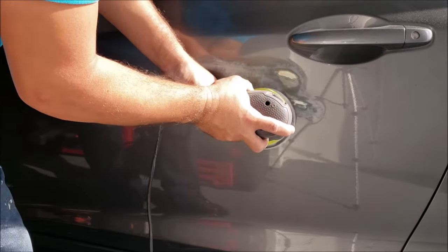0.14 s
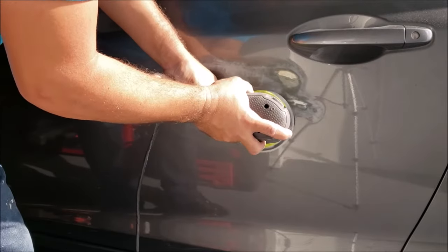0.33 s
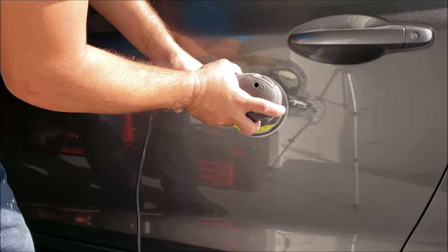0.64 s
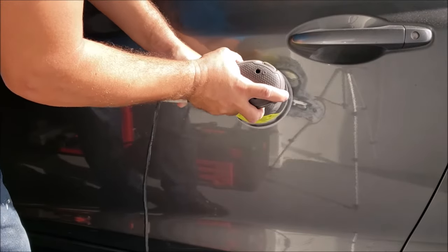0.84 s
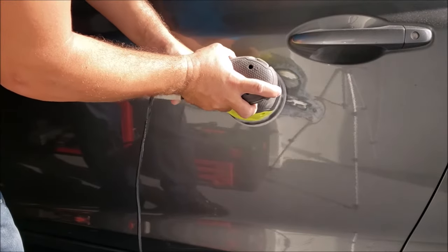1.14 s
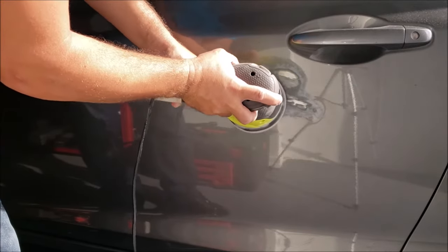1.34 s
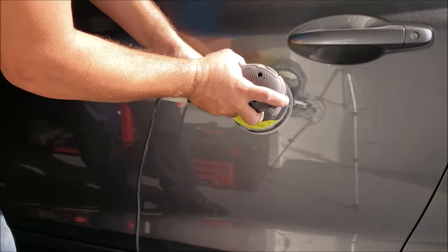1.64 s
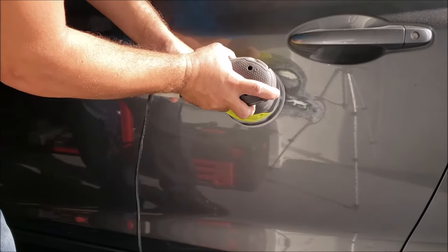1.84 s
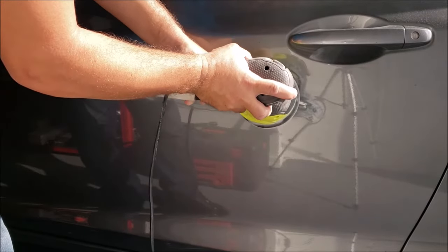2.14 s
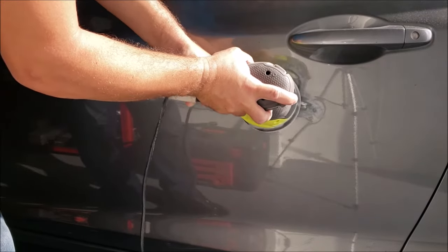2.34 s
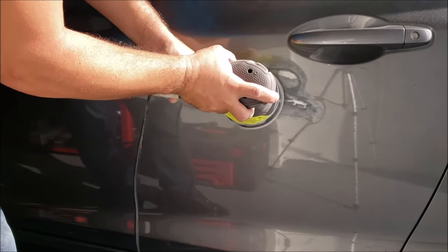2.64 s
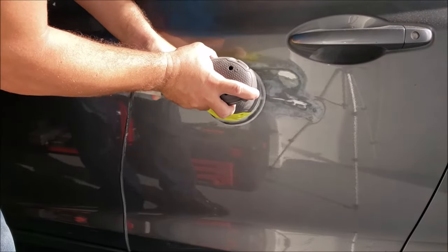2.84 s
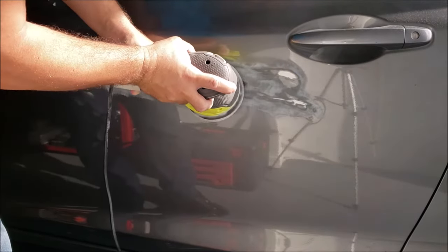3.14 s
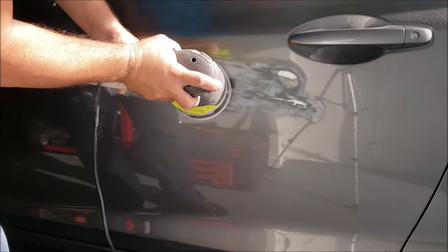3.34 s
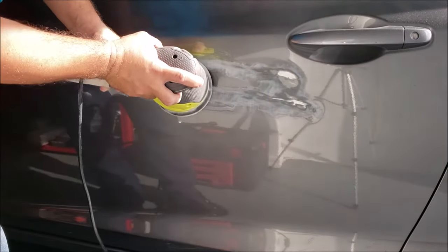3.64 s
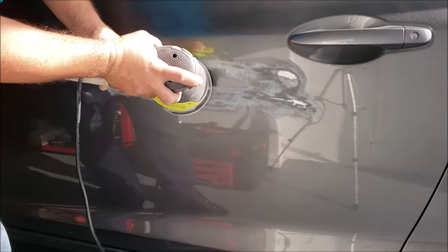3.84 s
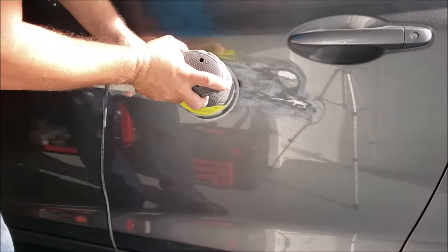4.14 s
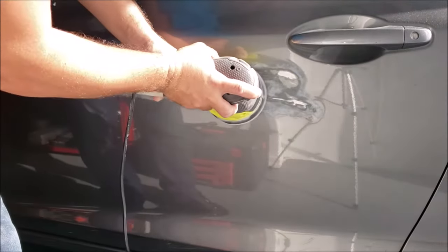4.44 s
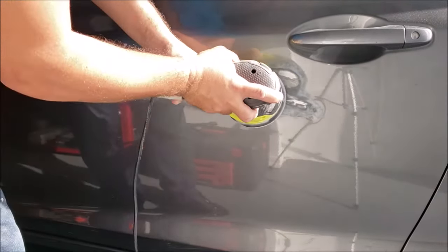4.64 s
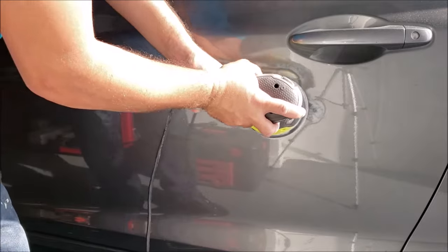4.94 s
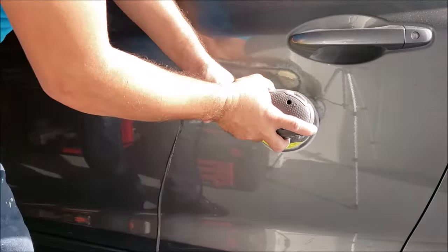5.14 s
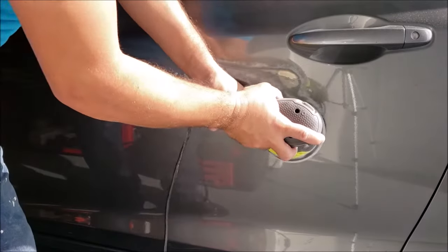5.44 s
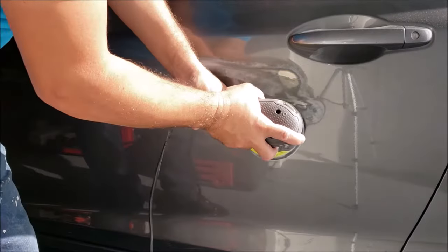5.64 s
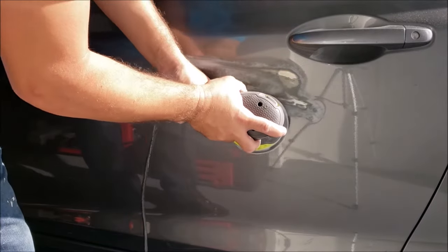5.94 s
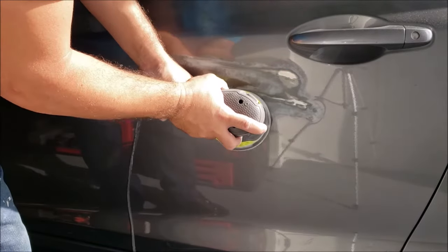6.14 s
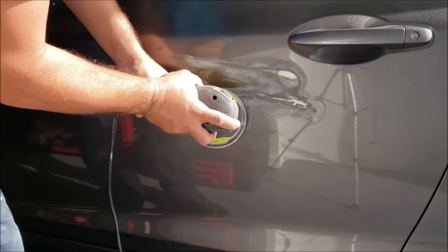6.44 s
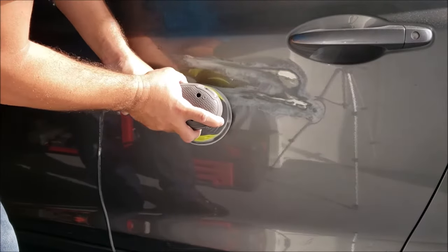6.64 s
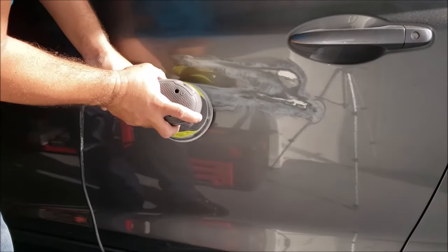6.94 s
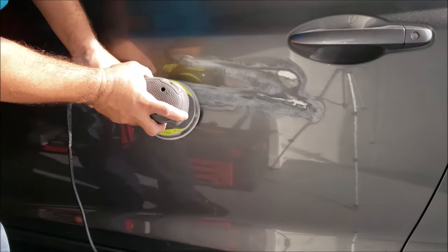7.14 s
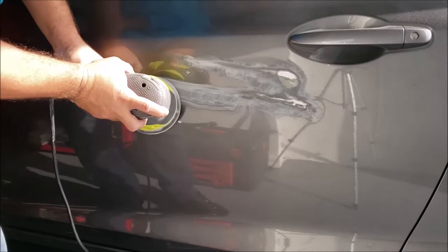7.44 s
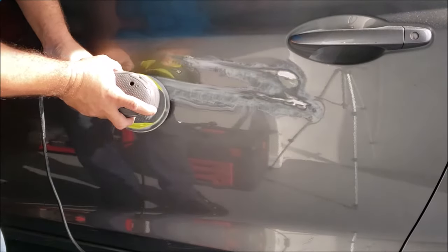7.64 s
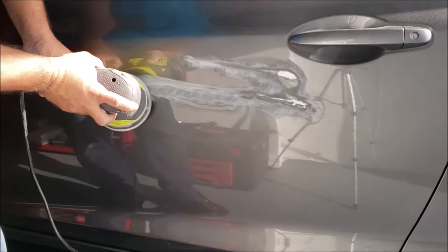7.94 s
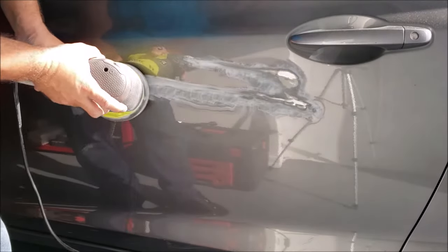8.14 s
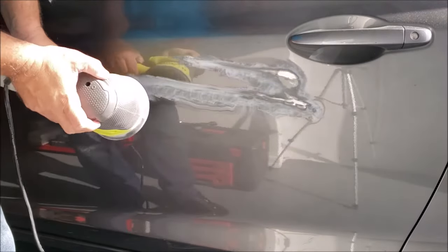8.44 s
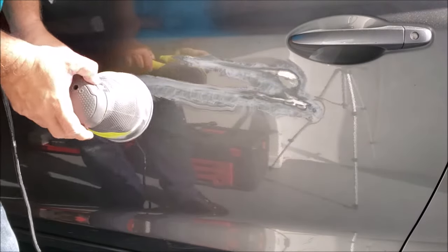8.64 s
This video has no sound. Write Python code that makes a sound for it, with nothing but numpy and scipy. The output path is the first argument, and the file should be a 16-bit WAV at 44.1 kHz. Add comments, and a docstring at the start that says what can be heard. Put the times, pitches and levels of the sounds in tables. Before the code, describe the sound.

An electric orbital sander hums steadily at close range on a steel car door, with gritty hiss, fan air and shifting overtones, then eases off.

```python
"""A workshop: an electric orbital sander strokes a steel car door, then is eased off near the end.
Its eccentric shaft shakes pad and door into a hum, with overtones that swell and fade with the pad's place.
Paper rub, grit hiss and fan air are filtered noise, the first two rough or uneven; short squeals ride on top.
A faint rumble lies below. A stereo microphone stands close by."""
import sys
import numpy as np
from scipy import signal
from scipy.fft import rfft, irfft, next_fast_len
from scipy.io import wavfile
from scipy.ndimage import uniform_filter1d

SR = 44100
rng = np.random.default_rng(int(sys.argv[2]) if len(sys.argv) > 2 else 0)


def inscribe(sig):
    """Save sig as 16-bit PCM at rate SR to the path in sys.argv[1].

    A 1-D sig is mono; a 2-D sig holds one channel per row.
    Samples are clipped to [-1, 1] before scaling.
    """
    pcm = np.round(np.clip(np.atleast_2d(sig).T, -1, 1) * 32767)
    wavfile.write(sys.argv[1], SR, pcm.astype(np.int16))


N = 387626
TIME = np.arange(N) / SR
PORT_S_PER_M = 0.00041  # lag between the two ports for each metre that the pad moves right


def undb(db):
    """Decibels to gain."""
    return 10 ** (np.asarray(db) / 20)


def unit(x):
    """Scale to rms 1."""
    return x / np.sqrt(np.mean(x ** 2))


def curves(table):
    """Each column of a table, joined by straight lines in time."""
    seconds, *columns = np.transpose(table)
    return [np.interp(TIME, seconds, column) for column in columns]


def ramp(start, length):
    """Rise evenly from 0 to 1."""
    return np.clip((TIME - start) / length, 0, 1)


def walk(rate):
    """Smooth random drift: about `rate` fresh draws a second, with a spread near 1."""
    steps = signal.resample_poly(rng.standard_normal(1024), 8, 1)
    return np.interp(TIME * rate * 8, np.arange(len(steps)), steps)


def shaped(x, gain):
    """Filter by a gain that is a function of frequency."""
    size = next_fast_len(N + 8192)
    hz = np.maximum(np.arange(size // 2 + 1) * SR / size, 1)
    return irfft(rfft(x, size) * gain(hz), size)[..., :N]


def spectrum_db(f, spectrum):
    """Read a spectrum table, joined by straight lines over log frequency."""
    hz, db = np.transpose(spectrum)
    return np.interp(np.log(f), np.log(hz), db)


def colour(x, spectrum):
    """Give noise a spectrum, at rms 1."""
    return unit(shaped(x, lambda f: undb(spectrum_db(f, spectrum))))


def ring(x, modes):
    """Pass through a bank of parallel resonances, at rms 1."""
    def gain(f):
        return sum(undb(db) / (1 + 1j * (f * f - hz * hz) / (f * width)) for hz, width, db in modes)
    return unit(shaped(x, gain))


def noise_pair(likeness):
    """Left and right noise with the given correlation."""
    c = np.clip(likeness, 0, 1)
    mid, side = rng.standard_normal((2, N))
    return np.sqrt((1 + c) / 2) * mid + np.sqrt((1 - c) / 2) * np.array([side, -side])


def pan(db):
    """Left and right gains for a level difference, left minus right."""
    return undb(np.array([[.5], [-.5]]) * db)


def tone(phase, lead):
    """A sine of rms 1 that reaches the left port `lead` radians before the right."""
    return np.sqrt(2) * np.sin(phase + np.array([[.5], [-.5]]) * lead)


# shaft speed under changing load, before a slight random waver: (time [s], speed [turns/s])
SHAFT_SPEED = [(0, 205.5), (.2, 206.2), (.72, 207.3), (.87, 207.3), (1.03, 206.2), (1.25, 206.4),
               (1.83, 205.4), (2.45, 204.5), (2.9, 205.1), (3.45, 204.9), (3.82, 205.4), (4.15, 206.2),
               (4.6, 204.6), (5.1, 205.7), (5.35, 206.9), (6.15, 205.8), (6.95, 204.6), (7.4, 205),
               (7.82, 205.4), (8.2, 207.7), (8.55, 211.8), (8.65, 210.5), (8.79, 199.4)]


def shaft(waver=0.00093):
    """The motor shaft: its speed, and its running angle in radians with a slight random waver."""
    speed = curves(SHAFT_SPEED)[0]
    turn = 2 * np.pi * np.cumsum(speed * (1 + waver * walk(20))) / SR
    return speed, turn


# strokes along the door: (time [s], right of the microphone [m], above the starting height [m])
STROKES = [(0, .096, 0.0021), (.5, 0.093, 0.017), (1.2, 0.076, 0.043), (2.3, 0.088, 0.056),
           (3.2, -0.014, 0.079), (3.75, -0.062, 0.088), (4.2, -.032, 0.053), (4.8, .1, 0.054),
           (5.45, .158, -0.0087), (6, 0.072, -0.0052), (7, -.1, 0.028), (8, -.22, 0.035), (8.79, -.23, .04)]


def pad_place():
    """Metres right and up of the pad, moved smoothly by the hands."""
    return uniform_filter1d(np.array(curves(STROKES)), size=SR // 8, mode="nearest")


def rocking(loudest_at, spin_hz=3.25, strokes_s=2.05, settle_s=0.61, rock_share=0.1):
    """The pad's slow free spin presses each edge in turn; the rocking shrinks once long strokes begin."""
    depth = 1 - (1 - rock_share) * ramp(strokes_s, settle_s)
    return depth * np.cos(2 * np.pi * (spin_hz * TIME - loudest_at))


# hum of pad and door: (time [s], level before trim [dB], left minus right [dB])
HUM_LEVELS = [(0.0, -42, 4), (0.19, -44.5, 3.5), (1.25, -41, 1.5), (2.47, -43.5, 2.0), (2.91, -40, 1.0),
              (4.21, -40, 0.0), (4.84, -45.5, 1.5), (5.21, -45, 4.0), (5.36, -48, 4.5), (5.85, -44.5, 3.5),
              (6.19, -44.5, 4.5), (7.69, -41.5, 3), (7.86, -44, 2.5), (8.01, -52, 2.0), (8.22, -50, 3),
              (8.64, -52, 4.5), (8.72, -52, 0.5), (8.79, -61, -2.0)]


def hum(turn, trim_db=1.24, lead=.95, waver_db=0.44):
    """The eccentric weight shakes pad and door once a turn."""
    db, pan_db = curves(HUM_LEVELS)
    return tone(turn, lead) * pan(pan_db) * undb(db + trim_db + waver_db * walk(22))


# places where one overtone sings out:
# (multiple of shaft speed, right [m], up [m], radius [m], level before trim [dB])
SINGING_SPOTS = [(2, 0.068, 0.028, 0.031, -57), (2, -0.009, 0.05, 0.027, -59),
                 (2, -0.11, 0.043, 0.063, -65), (3, .079, 0.042, .024, -57), (3, -0.054, 0.097, 0.068, -53),
                 (3, 0.12, -0.034, 0.044, -56.5), (4, .076, 0.026, .019, -55),
                 (4, -0.072, 0.073, 0.027, -54), (4, 0.025, .065, .025, -61), (4, -0.15, 0.045, 0.04, -56),
                 (4, -0.056, 0.0065, 0.047, -59.5), (5, -.18, .046, 0.021, -64.5),
                 (5, .15, -.005, 0.022, -65), (6, 0.04, 0.085, 0.02, -49.5), (6, 0.025, 0.037, 0.046, -55),
                 (6, 0.081, 0.023, 0.03, -52.5), (7, 0.078, 0.058, 0.073, -66), (7, .04, 0.076, .012, -60),
                 (8, -0.013, 0.041, 0.022, -57), (8, 0.0356, .065, 0.019, -57),
                 (8, 0.11, -0.0085, 0.071, -63.5), (14, .09, 0.0045, .03, -69),
                 (9, 0.0687, 0.035, .014, -57.5), (9, -0.097, 0.089, 0.071, -62.5),
                 (9, 0.13, .014, .034, -64.5), (10, 0.081, .015, .03, -65), (10, 0.14, -0.022, 0.032, -63),
                 (12, 0.0097, 0.089, 0.025, -61.5), (12, 0.077, 0.014, 0.025, -63),
                 (13, -0.087, .03, .035, -65.5), (14, 0.034, -0.02, 0.027, -62.5),
                 (14, -.1, .03, 0.025, -67), (15, -0.1, .03, 0.041, -63), (16, 0.12, .033, .031, -78),
                 (17, 0.076, 0.089, 0.033, -62), (17, 0.014, -0.00031, 0.058, -66),
                 (18, 0.104, 0.026, .013, -58.5), (18, 0.13, -0.0077, 0.057, -65.5),
                 (18, -0.13, 0.0023, 0.057, -61), (19, -.04, 0.063, 0.056, -73),
                 (19, -0.19, 0.045, 0.043, -60.5), (21, 0.0065, 0.083, 0.019, -64),
                 (21, -0.1237, .034, 0.022, -66), (22, .08, .03, 0.018, -68),
                 (22, -0.037, 0.089, 0.015, -61.5), (24, 0.064, 0.029, 0.025, -62.5),
                 (25, -0.025, .08, 0.1, -68), (28, .08, 0.016, 0.032, -69), (29, 0.074, .07, 0.044, -70),
                 (36, -.04, 0.0067, 0.059, -69), (48, .09, 0.014, .025, -74)]
# places where the pad sits on a node of the door and one overtone fades:
# (multiple of shaft speed, right [m], up [m], radius [m], change of level [dB])
FADING_NODES = [(2, 0.093, 0.062, 0.013, -8.5), (2, 0.062, 0.071, 0.021, -10),
                (2, -0.153, .039, 0.017, -12), (2, 0.122, 0.0201, 0.0075, -8), (3, .098, 0.014, 0.015, -7),
                (4, .15, -.008, .02, -7), (6, .1, 0.072, 0.0078, -4), (6, 0.16, -.003, 0.013, 0)]


def overtone_db(order, rest_db, place):
    """An overtone swells while the pad crosses one of its spots, and fades on a node."""
    def nearness(right, up, radius):
        return np.exp(-((place[0] - right) ** 2 + (place[1] - up) ** 2) / radius ** 2)

    power = undb(rest_db) ** 2
    for multiple, *where, db in SINGING_SPOTS:
        if multiple == order:
            power = power + undb(db) ** 2 * nearness(*where)
    level_db = 10 * np.log10(power)
    for multiple, *where, db in FADING_NODES:
        if multiple == order:
            level_db = level_db + db * nearness(*where)
    return level_db


# overtones that the door radiates strongly, levels before trim:
# (multiple of shaft speed, resting level [dB], level with the pad eased off [dB], swing with the spin [dB],
#  share of a spin at which the swing peaks, left minus right [dB], left leads by [rad])
DOOR_OVERTONES = [(2, -64.5, -63.5, 2, 0.32, 3.5, -0.48), (3, -67, -57.5, 1, 0.026, 5, 0.13),
                  (4, -66.5, -68, 0.8, 0.8, 9, .95), (6, -63, -67, 2, 0.97, 5.5, 0.41),
                  (8, -69, -72, -2.5, .12, 11.5, -1.73), (9, -72.5, -65, 2.3, .2, 8.5, .4)]


def door_overtones(turn, place, lift, waver_db=0.99, wander_db=1.6, slip_rad=0.094, trim_db=-0.1):
    """The pad drags on the door, which rings at multiples of the turn; slipping roughens each a little."""
    out = 0
    port_lag = np.gradient(turn) * SR * PORT_S_PER_M * place[0]  # radians of the turn
    for order, rest_db, free_db, swing_db, peak_at, pan_db, lead in DOOR_OVERTONES:
        pressed_db = overtone_db(order, rest_db, place) + swing_db * rocking(peak_at)
        db = (1 - lift) * pressed_db + lift * free_db + trim_db
        db = db + waver_db * walk(28) + wander_db * walk(7)
        phase = order * turn + rng.uniform(0, 2 * np.pi) + slip_rad * walk(45)
        voice = tone(phase, lead - order * port_lag) * pan(pan_db)
        out = out + voice * with_squeals(order, db)
    return out


# weaker buzz of bearings and housing, levels before trim:
# (multiple of shaft speed, resting level [dB], level with the pad eased off [dB])
HOUSING_BUZZ = [(5, -78.5, -81), (7, -77, -69.5), (10, -72, -72), (11, -69.5, -69), (12, -71.5, -73),
                (13, -80.5, -76), (14, -72.5, -70), (15, -72, -70), (16, -73, -72), (17, -70, -78),
                (18, -74.5, -69), (19, -78, -78), (20, -81, -76), (21, -73, -70), (22, -76, -72),
                (23, -78, -77), (24, -69.5, -72), (25, -84, -75), (27, -84, -77), (28, -81, -75),
                (29, -76, -80), (36, -80, -81), (48, -76, -78), (58, -87, -86), (72, -84, -80)]


def buzz(turn, place, lift, waver_db=2.6, swing_db=1.5, slip_rad=0.31, slip_rad_per_order=0.0056,
         lead=1.32, pan_db=9.5, trim_db=-0.48):
    """Bearings and housing sound weaker overtones that come and go with the pad's place."""
    out = 0
    for order, rest_db, free_db in HOUSING_BUZZ:
        db = (1 - lift) * overtone_db(order, rest_db, place) + lift * free_db + trim_db
        # the chattering pad makes each overtone flutter in level and phase, the phase of high ones most
        flutter_db = waver_db * walk(32) + swing_db * rocking(rng.random())
        slip = (slip_rad + slip_rad_per_order * order) * walk(55)
        phase = order * turn + rng.uniform(0, 2 * np.pi) + slip
        voice = tone(phase, lead + 0.55 * walk(1))
        out = out + voice * with_squeals(order, db) * undb(flutter_db)
    return out * pan(pan_db)


# door and pad resonances that the rubbing excites: (frequency [Hz], width [Hz], relative level [dB])
PANEL_RESONANCES = [(244, 120, -3.5), (580, 25, -19.5), (589.6, 34, 13), (657, 46, 1.5), (812, 25, 7.5),
                    (873, 150, 5), (1120, 29, -1), (1190, 86, 4.5), (1420, 230, -10.5)]
# broad rubbing noise: (frequency [Hz], relative density [dB per Hz])
RUB_SPECTRUM = [(30, -40), (100, -12.5), (170, -1), (330, -6.5), (440, -21), (650, -2), (1300, 4.5),
                (1800, -6), (3000, -11), (8000, -44)]


def rubbing(turn, throb=0.13, flicker_db=0.57, ring_db=3.0, broad_db=1.5, pan_db=6):
    """Friction peaks once an orbit and rings the panel in uneven spurts."""
    drag = 1 + throb * np.cos(turn)
    ring_drive = noise_pair(0.48) * drag * undb(flicker_db * walk(35))
    rings = ring(ring_drive, PANEL_RESONANCES) * undb(ring_db) * pan(pan_db)
    broad_drive = noise_pair(0.53) * drag * undb(flicker_db * walk(45))
    broad = colour(broad_drive, RUB_SPECTRUM) * undb(broad_db) * pan(2.8)
    return rings + broad


def rub_level_db(lift, pressed_db=-56.5, lift_db=-5, fresh_db=3.5, smoothing_s=3.1):
    """Rubbing weakens as the paint gets smooth, and again as the pad is eased off."""
    return pressed_db - fresh_db * (1 - np.exp(-TIME / smoothing_s)) + lift_db * lift


# the microphone body shades its right port from fan and grit: (frequency [Hz], left minus right [dB])
PORT_SHADE = [(500, 1.5), (2500, 6.5), (5500, 8), (7200, 8.5), (8400, 2.5), (11500, 2.5), (14500, 7)]


def shaded(pair):
    """Tilt left against right, frequency by frequency."""
    return shaped(pair, lambda f: pan(spectrum_db(f, PORT_SHADE)))


# fan air: (frequency [Hz], relative density [dB per Hz])
AIR_SPECTRUM = [(100, -5), (400, -0.5), (700, 3), (1500, -1.5), (2300, 3.5), (3000, 0), (4500, -1),
                (5900, 0.5), (7300, -2), (7800, -8.5), (8800, -9), (11500, -7.5), (13000, -11),
                (16000, -24)]


def motor_air(turn, lift, throb=0.023, pressed_db=-52.5, lift_db=-1):
    """The cooling fan blows broad noise through the housing slots, with a slight throb once a turn."""
    air = colour(noise_pair(0.057) * (1 + throb * np.cos(turn)), AIR_SPECTRUM)
    return shaded(air) * undb(pressed_db + lift_db * lift)


# grit hiss: (frequency [Hz], relative density [dB per Hz])
GRIT_SPECTRUM = [(2000, -31), (7000, -19), (8500, -15), (10000, -7), (11900, -2), (13800, -3.5),
                 (15700, -2.5)]
# how hard the paper bites, unevenly where the stroke turns round: (time [s], level before trim [dB])
PAPER_BITE = [(0, -57), (.2, -58), (.9, -56.5), (2.5, -57.5), (3, -56), (3.8, -58.2), (5.05, -57),
              (5.38, -58.5), (5.52, -62), (5.68, -56.5), (5.88, -59.5), (6.25, -58), (6.9, -56), (7.8, -57),
              (8.1, -64), (8.6, -65), (8.79, -69)]


def grit(flicker_db=0.5, trim_db=4.0):
    """Countless abrasive grains cut the paint: a high hiss that follows the bite of the paper."""
    hiss = colour(noise_pair(0) * undb(flicker_db * walk(60)), GRIT_SPECTRUM)
    return shaded(hiss) * undb(trim_db + curves(PAPER_BITE)[0])


# low rumble: (frequency [Hz], relative density [dB per Hz])
RUMBLE_SPECTRUM = [(15, -36), (30, -9), (41, -15), (50, -8), (62, 0), (85, -12), (130, -10), (250, -27),
                   (600, -33)]
# spells in which it stands out: (start [s], end [s], level added to the faint floor [dB])
RUMBLE_SPELLS = [(-.1, 1.254, -61.5), (8.38, 8.9, -62.5)]


def rumble(quiet_db=-81, edge_s=.04):
    """A faint low rumble that stands out in two spells."""
    gain = undb(quiet_db)
    for start, end, db in RUMBLE_SPELLS:
        gain = gain + undb(db) * np.clip(np.minimum(TIME - start, end - TIME) / edge_s, 0, 1)
    return colour(noise_pair(0.9), RUMBLE_SPECTRUM) * gain


# nearby surfaces that throw the sound back:
# (delay [s], change of delay per metre of stroke [s/m], level [dB])
SURFACE_ECHOES = [(.0021, 0.0038, -26), (.0047, -0.0097, -27.5), (.0071, .0035, -15), (0.012, -.0022, -18),
                  (0.0202, 0.021, -12)]


def workshop(pair, right):
    """The strokes shift the lag between the ports and sweep the combs of the early echoes."""
    out = []
    for x, side in zip(pair, (1, -1)):
        y = delayed(x, side * PORT_S_PER_M * right / 2)
        for delay, slope, db in SURFACE_ECHOES:
            # each port hears the surface over a slightly different path
            path_s = 0.000294 * rng.uniform(-0.976, 1)
            y = y + undb(db) * delayed(x, delay + slope * right + path_s)
        out.append(y)
    return np.array(out)


def delayed(x, seconds):
    """Read a sound at a moving delay, upsampled to keep the treble."""
    return np.interp(TIME - seconds, np.arange(2 * N) / (2 * SR), signal.resample_poly(x, 2, 1))


# the paper catches and the door squeals briefly, about once a spin at first:
# (time [s], multiple of shaft speed, level before pan and flutter [dB], half length [s])
PAPER_SQUEALS = [(.28, 8, -54.5, .06), (.56, 8, -54, .06), (1.024, 8, -55, .05), (1.289, 8, -53, 0.061),
                 (1.547, 8, -50.5, 0.047), (1.9, 8, -51.5, 0.045), (5.02, 8, -55, 0.043),
                 (7.97, 7, -64, 0.058), (7.97, 9, -57, 0.053), (8.448, 11, -64, 0.11), (8.48, 16, -67, .1),
                 (8.62, 7, -64, .09), (8.68, 9, -62, .08), (8.6, 8, -62, 0.087), (8.72, 10, -60, 0.063)]


def with_squeals(order, db):
    """Gain of an overtone at this level, with the power of its brief squeals on top."""
    power = undb(db) ** 2
    for s, multiple, squeal_db, half_length in PAPER_SQUEALS:
        if multiple == order:
            power = power + undb(squeal_db) ** 2 * np.exp(-((TIME - s) / half_length) ** 2)
    return np.sqrt(power)


# the pad skims the paint as it lifts: (time [s], level [dB])
SKIM_LEVELS = [(0, -94), (7.2, -78), (7.7, -64), (8.2, -57.5), (8.4, -54), (8.79, -56.5)]
# skimming noise: (frequency [Hz], relative density [dB per Hz])
SKIM_SPECTRUM = [(300, -26), (480, 2), (600, 14), (750, 4), (1100, -32), (1500, -1), (2300, 3), (2900, -1),
                 (4000, 3), (7000, -40)]


def skim(turn, throb=0.29, pan_db=5):
    """Under little pressure the pad brushes the door, more strongly on one part of each orbit."""
    brush = colour(noise_pair(0.38) * (1 + throb * np.cos(turn)), SKIM_SPECTRUM)
    return brush * undb(curves(SKIM_LEVELS)[0]) * pan(pan_db)


def scene(free_db_per_hz=0.42, hiss_db_per_m=-9.5):
    """One shaft turns beneath the layers; the pad's place and the lift of the hands set levels."""
    speed, turn = shaft()
    place = pad_place()
    lift = ramp(7.86, 0.37)  # the hands ease the pad off: start and duration in seconds
    # the housing buzzes more as the shaft leaves its working speed
    free_db = free_db_per_hz * np.abs(speed - np.median(speed))
    tones = hum(turn) + door_overtones(turn, place, lift) + buzz(turn, place, lift) * undb(free_db)
    rush = rubbing(turn) * undb(rub_level_db(lift)) + motor_air(turn, lift) + skim(turn)
    hiss = workshop(rush, place[0]) + grit()
    # all the noise of pad and fan is a little weaker higher up the door
    height_db = hiss_db_per_m * (place[1] - np.mean(place[1]))
    return tones + hiss * undb(height_db) + rumble()


def record(dry, top_hz=15750):
    """The recorder cuts the top steeply with an elliptic low-pass."""
    return signal.sosfilt(signal.ellip(12, .1, 80, top_hz, fs=SR, output="sos"), dry)


dry = scene()
out = record(dry)
inscribe(out)
```